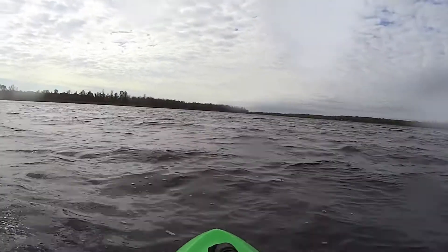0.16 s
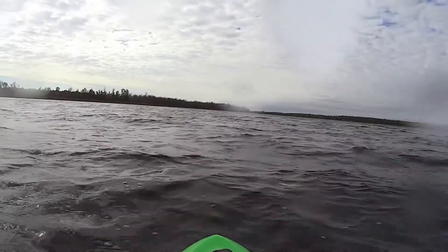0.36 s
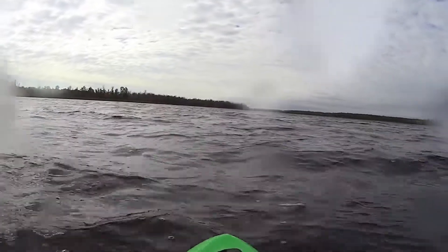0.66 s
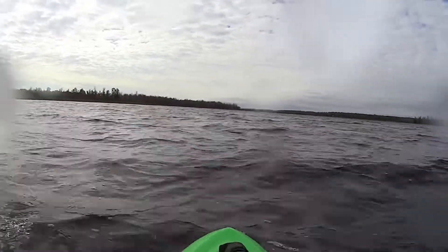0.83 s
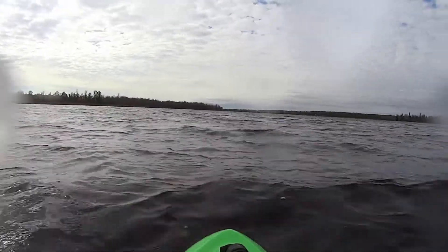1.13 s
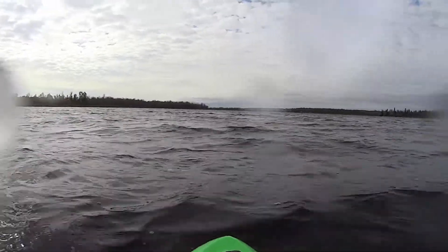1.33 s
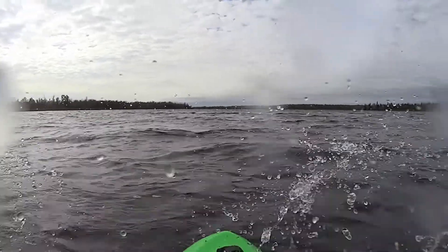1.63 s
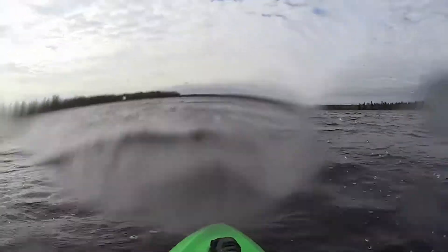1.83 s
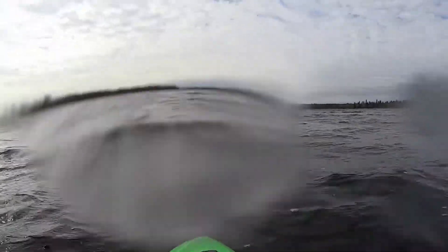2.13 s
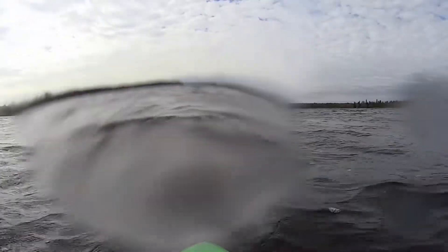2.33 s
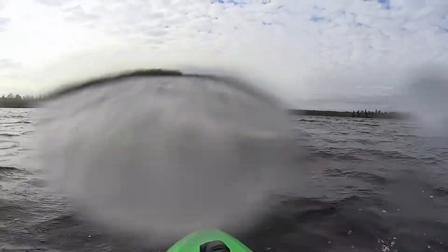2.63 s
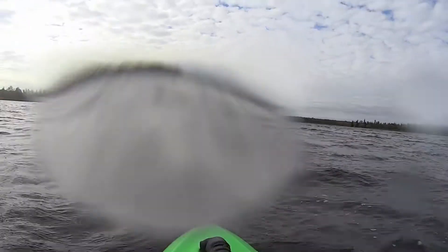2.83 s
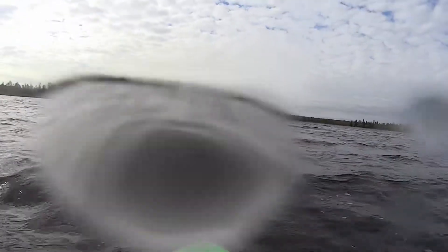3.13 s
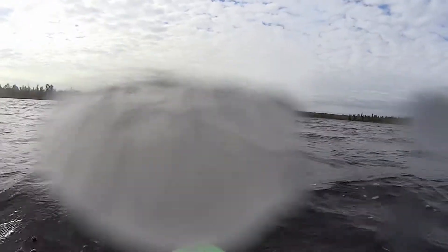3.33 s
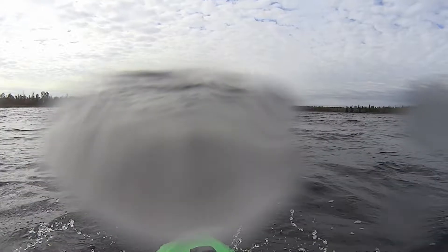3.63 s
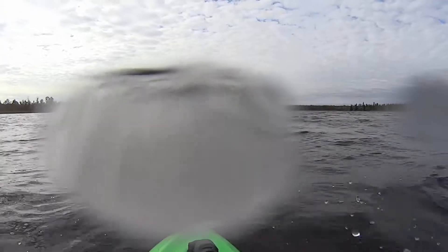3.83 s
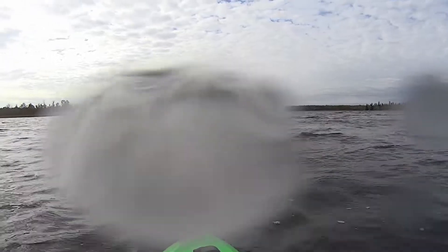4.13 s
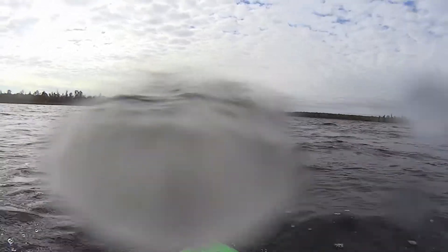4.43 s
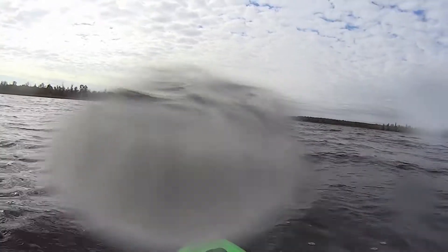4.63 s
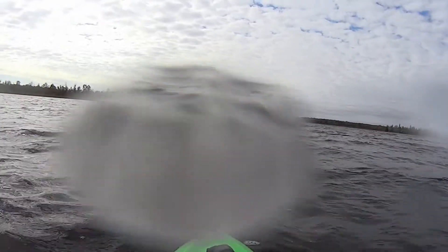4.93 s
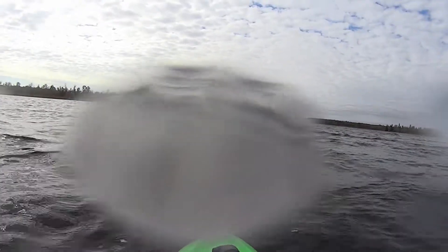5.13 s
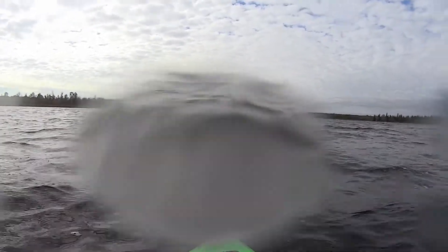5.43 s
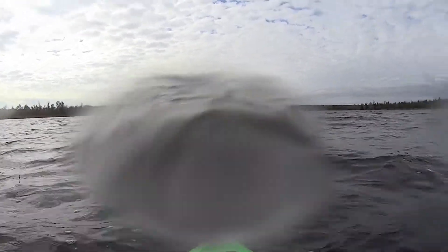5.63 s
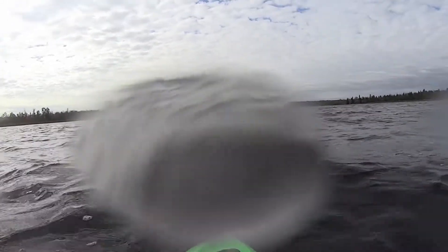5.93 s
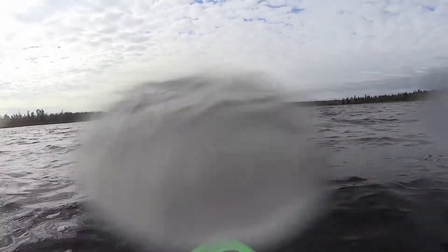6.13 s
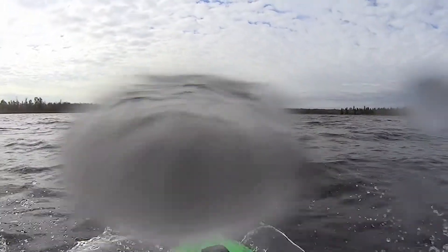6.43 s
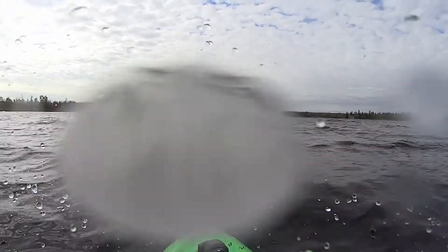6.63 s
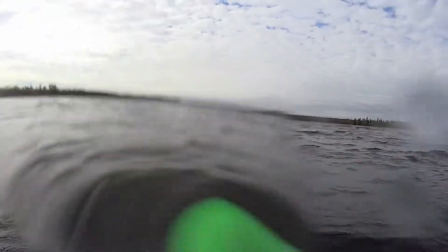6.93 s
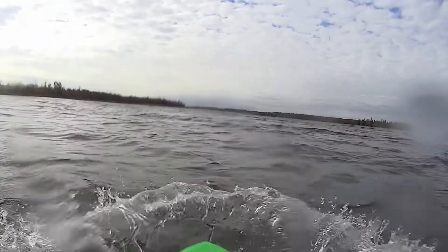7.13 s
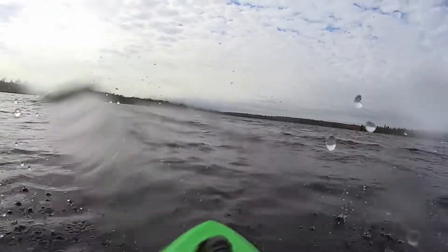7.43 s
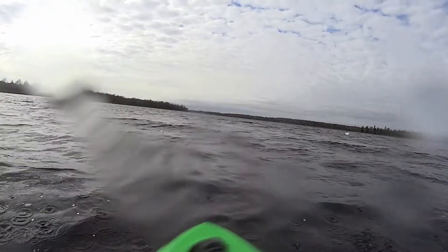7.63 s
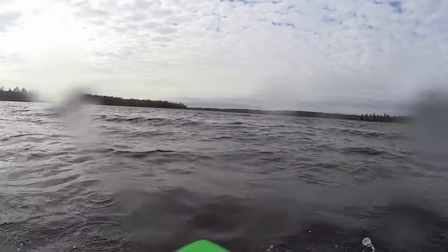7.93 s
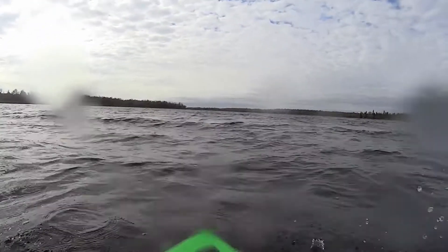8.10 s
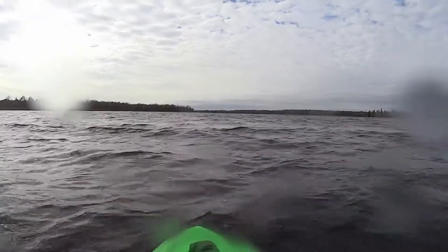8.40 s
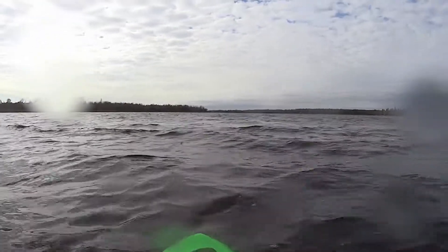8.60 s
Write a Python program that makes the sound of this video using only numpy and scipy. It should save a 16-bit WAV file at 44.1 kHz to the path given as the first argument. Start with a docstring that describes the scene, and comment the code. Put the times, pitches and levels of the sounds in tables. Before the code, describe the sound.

Close, slightly muffled stereo sound from a housing clamped to a hollow plastic kayak on choppy open water. A bright plop and slap come at about 0.2 s, with splashy knocks at 0.5 and 0.7 s. Scattered small plops lead to a boomy slap near 1.6 s and a busy run of bubbles, gurgles and foam fizz until 2.4 s. A sharp drop tick lands at 2.7 s. At 3.1 s the hardest wave knocks the hull, sweeping quickly from high to low with a deep jolt. More slosh follows at 3.5 s, loud ringing plops around 4.1-4.3 s, and a wash at 4.7 s. A hollow thud comes at 5.4 s; plops crowd 6.05-6.4 s, then booming slaps at 6.4 and 6.7 s. Washes and fizz fill 7-7.9 s, with a hard knock at 7.7 s. It calms into sparse plops, with a last small wash near 8.7 s. Low wind rumbles throughout.

```python
"""Choppy water sloshes on a hollow plastic kayak: filtered noise rings hull modes, bubble swarms ring deck and clamp.
Single plops are damped tones with splashes; far blows are chains of rings gliding down in pitch.
Foam fizzes as shaped noise and tiny bubbles, spray drops tick, wind rumbles low, microphones hiss.
Two paths blend into two ports of a clamped housing with their own balance and phase. Table levels are relative."""
import sys
import numpy as np
from scipy import signal
from scipy.fft import rfft, irfft, next_fast_len
from scipy.io import wavfile
from scipy.ndimage import uniform_filter1d, map_coordinates

SR = 44100
rng = np.random.default_rng(int(sys.argv[2]) if len(sys.argv) > 2 else 0)


def unload_wav(signal):
    """Save mono or channel-first audio to the path in sys.argv[1] as 16-bit WAV at rate SR, clipped to [-1, 1]."""
    wavfile.write(
        sys.argv[1],
        SR,
        np.round(np.clip(np.atleast_2d(signal).T, -1, 1) * 32767).astype(np.int16),
    )


N = 386302


def amp(db):
    """Gain of a level in dB."""
    return 10 ** (np.asarray(db) / 20)


def unit(x):
    """x at rms 1."""
    return x / np.sqrt(np.mean(x ** 2) + 1e-20)


def along(points, hz):
    """Each column after the first of (Hz, ..) rows, read on a log axis."""
    knots_hz, *columns = np.transpose(points)
    return np.squeeze([np.interp(np.log(hz + 1), np.log(knots_hz + 1), c) for c in columns])


def trace(rows):
    """dB per sample of a (s, dB) curve."""
    return np.interp(np.arange(N) / SR, *np.transpose(rows))


def wobble(knots_per_s):
    """Smooth random curve through normal knots."""
    return map_coordinates(rng.standard_normal(N // 100), [np.arange(N) * knots_per_s / SR])


def filtered(x, response):
    """x times a complex response of frequency, zero-padded."""
    size = next_fast_len(N + SR // 2)
    spectrum = rfft(x, size) * response(np.fft.rfftfreq(size, 1 / SR))
    return irfft(spectrum, size)[..., :N]


def ringing(x, modes):
    """x through a body: parallel resonances of (Hz, width Hz, dB), signs alternating."""
    def response(f):
        return sum((-1) ** k * amp(db) * 1j * f * width / (centre ** 2 - f * f + 1j * f * width)
                   for k, (centre, width, db) in enumerate(modes))
    return filtered(x, response)


def steady(push, modes):
    """Rms with which a body answers an even push."""
    return np.std(ringing(push[0], modes))


def bubbles(start_s, hz, size, cycles, rise, span, soft=1):
    """Sum of tones that swell and decay over some cycles while the pitch bends; span samples each."""
    u = np.arange(span) / SR * (hz / cycles)[:, None]  # 1 at the peak
    shape = (u * np.exp(1 - u)) ** soft
    tones = size[:, None] * shape * np.sin(2 * np.pi * cycles * u * (1 + rise * u))
    at = (start_s * SR).astype(int)[:, None] + np.arange(span)
    return np.bincount(at.ravel(), tones.ravel(), N + span)[:N]


def swarm(count, centre_hz, spread, cycles, scatter_db, span, bend=0):
    """Cloud of random bubbles with scattered size, pitch and bend; path two is shifted by half the length."""
    when, pitch, size = rng.random(count), rng.standard_normal(count), rng.exponential(size=count)
    hz = np.clip(centre_hz * np.exp(spread * pitch), 30, 10000)
    rise = bend * (.5 + rng.standard_normal((count, 1)))
    gain = amp(scatter_db * np.minimum(size, 3))
    cloud = unit(bubbles(when * (N - 1) / SR, hz, gain, cycles, rise, span))
    return np.array([cloud, np.roll(cloud, N // 2)])


def bursts(rows, fade_s):
    """Gain per sample of (s, length s, first dB, last dB, rise s) bursts, then 20 dB lost per fade_s."""
    gain = np.zeros(N + SR)
    for start_s, length_s, first_db, last_db, rise_s in rows:
        t = np.arange(int((length_s + 4 * fade_s) * SR)) / SR
        db = np.interp(t, [0, length_s], [first_db, last_db])
        db = db - 20 * np.maximum(t - length_s, 0) / fade_s
        gain[int(start_s * SR):][:len(t)] += amp(db) * np.minimum(t / rise_s, 1)
    return gain[:N]


def shaped(start_s, length_s, db, change_db, rise_s):
    """Burst rows that change by change_db over their length."""
    return np.transpose([start_s, length_s, db, db + change_db, rise_s + 0 * start_s])


# Short spurts of bubbles that leave the hull alone. Each row: start in seconds, length in seconds, level in dB.
SPURT_ROWS = [(0.057, 0.02, -18.5), (0.108, 0.018, -26), (0.273, 0.013, -26.5), (0.402, 0.01, -37),
              (0.457, 0.017, -34), (.875, 0.16, -35.5), (1.392, 0.013, -20), (1.419, 0.016, -19.5),
              (1.489, 0.027, -12), (1.685, 0.013, -9.5), (1.762, 0.008, -16), (1.779, 0.0062, -15),
              (1.802, 0.012, -20.5), (1.904, 0.014, -22), (2.42, 0.076, -23.5), (2.785, 0.021, -15),
              (3.61, 0.085, -24.5), (4.094, 0.34, -32.5), (4.56, 0.033, -30.5), (4.979, .03, -22),
              (5.254, 0.015, -24.5), (6.202, 0.028, -16.5), (6.233, 0.036, -20), (6.29, 0.017, -19),
              (6.694, .05, -25), (6.941, 0.15, -20.5), (7.218, 0.014, -21), (8.521, 0.35, -32.5)]
# Waves that slap the hull and die away.
# Each row: start in seconds, length in seconds, bubbling in dB, boom in dB, knock in dB.
SLAP_ROWS = [(0.175, 0.079, -20.5, -24.5, -27), (0.484, 0.034, -14, -29, -19),
             (0.672, 0.018, -14, -16.5, -16.5), (1.579, 0.019, -17, -9.5, -12),
             (3.112, 0.038, -11, -16, -6.5), (3.497, 0.07, -23, -54, -27), (5.304, 0.11, -21.5, -32.5, -39),
             (5.428, 0.041, -23.5, -16.5, -12.5), (6.384, 0.024, -13.5, -14, -29),
             (6.722, 0.046, -38, -12.5, -20), (7.442, 0.028, -22, -30, -23), (7.704, 0.065, -26, -30, -7.5)]
# Longer washes as the blade pulls or a wave runs along the boat.
# Each row: start in seconds, length in seconds, bubbling in dB, boom in dB.
WASH_ROWS = [(0.492, 0.07, -21.5, -32.5), (1.844, 0.16, -47, -27.5), (2.091, 0.24, -21.5, -23.5),
             (3.158, 0.061, -28.5, -16.5), (3.525, 0.077, -19.5, -24), (4.195, 0.17, -24, -29),
             (4.673, 0.092, -18, -20), (5.568, 0.1, -29, -35), (6.986, 0.1734, -22.5, -16.5),
             (7.463, 0.18, -33, -24), (7.708, 0.24, -20.5, -18), (8.708, 0.05, -17.5, -25)]
SLAP_FALL_DB, SLAP_RISE_S = 11.5, 0.0046  # also for spurts; fall is over the length
WASH_SWELL_DB, WASH_BOOM_FALL_DB, WASH_RISE_SHARE = 1, 4, 0.22  # bubbling grows, boom sinks; share of length
WASH_KNOCK_DB = -1  # upper hull modes over the boom
HULL_LAG_S = 0.0057  # the hull answers a slap after the first splash


def waves():
    """Gains with which slaps, washes and spurts drive bubbling, boom and knock."""
    slap_s, slap_length_s, slap_bubbling_db, slap_boom_db, slap_knock_db = np.transpose(SLAP_ROWS)
    wash_s, wash_length_s, wash_bubbling_db, wash_boom_db = np.transpose(WASH_ROWS)

    def slap(db, lag_s):
        """Rows of quick rise and steady fall."""
        return shaped(slap_s + lag_s, slap_length_s, db, -SLAP_FALL_DB, SLAP_RISE_S)

    def wash(db, change_db):
        """Rows of slow rise."""
        return shaped(wash_s, wash_length_s, db, change_db, WASH_RISE_SHARE * wash_length_s)

    spurts = shaped(*np.transpose(SPURT_ROWS), -SLAP_FALL_DB, SLAP_RISE_S)
    surge = [slap(slap_bubbling_db, 0), wash(wash_bubbling_db, WASH_SWELL_DB), spurts]
    boom = [slap(slap_boom_db, HULL_LAG_S), wash(wash_boom_db, -WASH_BOOM_FALL_DB)]
    knock = [slap(slap_knock_db, HULL_LAG_S), wash(wash_boom_db + WASH_KNOCK_DB, -WASH_BOOM_FALL_DB)]
    return (bursts(np.vstack(surge), fade_s=0.019),
            bursts(np.vstack(boom), fade_s=0.074),
            bursts(np.vstack(knock), fade_s=0.022))


# Bubbling of the chop between waves, also drives lapping. Each row: time in seconds, level in dB.
CHOP_CURVE = [(0, -34), (.3, -44), (.7, -37), (1.2, -41.5), (1.58, -30), (2.0, -32.5), (2.54, -36),
              (3.39, -44.5), (4.03, -36), (4.45, -40), (5.0, -38), (5.49, -41.5), (5.8, -49), (6.04, -42.5),
              (6.2, -33), (6.62, -34.5), (7.7, -34), (8.48, -41), (8.76, -32)]
# Modes of deck and clamp, also rung by plops. Each row: centre in Hz, width in Hz, level in dB.
DECK_MODES = [(510, 390, -8.5), (913.7, 57.5, 0.5), (1162, 136, -1.5), (1496, 62.5, 1), (1630, 93, 0),
              (2095, 527, -7.5), (2756, 410, -9), (4150, 1030, -16.5)]


def churn(surge):
    """Chop mixes crackle and gurgle, a surge crackle and blips; both shake the deck."""
    crackle = swarm(count=7000, centre_hz=1528, spread=0.664, cycles=1.09, scatter_db=3, span=256)
    gurgle = swarm(count=2200, centre_hz=1401.0, spread=0.5464, cycles=5.51, scatter_db=5.5, span=800, bend=0.0536)
    blips = swarm(count=5000, centre_hz=1593, spread=0.4986, cycles=4.53, scatter_db=2.0, span=600, bend=0.0508)
    clumps = amp(3.63 * wobble(40) + 1.7 * wobble(90))
    rush = 1.2 * rng.standard_normal((2, N))
    dense = clumps * (crackle + rush)
    calm_push = amp(trace(CHOP_CURVE)) * (.65 * dense + .55 * gurgle)
    surge_push = surge * (.8 * dense + .7 * blips)
    return ringing(calm_push + surge_push, DECK_MODES) / steady(dense, DECK_MODES)


# Modes of the hollow hull. Each row: centre in Hz, width in Hz, level in dB.
HULL_MODES = [(107, 190, -15.5), (160.3, 12.1, 2.5), (235.4, 31.4, -8), (309.2, 30, -5.5), (367, 57, -10.5),
              (568, 81, -10.5), (703, 41, -8)]
# The whole boat jolts after the hardest wave. Each row: start in seconds, pitch in Hz, peak in dB.
HEAVE_ROWS = [(3.14, 38, -29)]
CALM_DB, LAPPING_DB, LAPPING_GROWS = -36.5, -36, 0.93  # middling chop, its lapping, dB lapping per dB chop


def slosh(boom, knock):
    """Lumpy low pressure drums on the hollow hull; sharp waves reach its upper modes."""
    lumps = amp(1.8 * wobble(14) + 1.8 * wobble(45))
    push = lumps * rng.standard_normal((2, N))
    soft = filtered(push, lambda hz: 1 / (1 + 1j * hz / 900) ** 2)
    dull = filtered(soft, lambda hz: hz < 200)
    lapping = amp(LAPPING_DB + LAPPING_GROWS * (trace(CHOP_CURVE) - CALM_DB))
    lows = (lapping + boom) * dull
    highs = (lapping + knock) * (soft - dull)
    start_s, hz, db = np.transpose(HEAVE_ROWS)
    heave = bubbles(start_s, hz, amp(db), cycles=2.0, rise=-0.01, span=SR // 2)
    return ringing(lows + highs, HULL_MODES) / steady(soft, HULL_MODES) + heave


# Fizz of breaking foam. Each row: time in seconds, level in dB.
FOAM_CURVE = [(0, -44), (.29, -52), (.95, -41), (1.1, -49.5), (1.36, -53), (1.76, -31.5), (2.14, -44),
              (2.34, -31.5), (2.7, -33.5), (2.85, -45), (3.02, -50.5), (3.49, -39), (3.9, -45.5),
              (4.56, -36.5), (5.1, -50), (5.75, -55.5), (6.54, -38), (7.37, -32), (7.61, -38.5),
              (8.2, -33.5), (8.55, -47.5), (8.76, -45)]
# Foam spectrum through the housing. Each row: frequency in Hz, density in dB per Hz.
FIZZ_SPECTRUM = [(600, -37), (1200, 4), (1700, 3), (2200, -0.5), (2800, -1), (3300, -5.5), (4400, -4.5),
                 (6000, -8.5), (7200, -21.5), (11000, -24)]


def foam():
    """Countless tiny bubbles burst over a hiss with drifting time-frequency patches."""
    cloud = swarm(count=6000, centre_hz=4387, spread=0.404, cycles=12.5, scatter_db=3.5, span=128)
    z = signal.stft(rng.standard_normal((2, N)) + 0.78 * cloud, nperseg=256)[2]
    patches = uniform_filter1d(rng.standard_normal(z.shape[1:]), size=8, axis=0)  # across frequency
    patches = uniform_filter1d(patches, size=12, axis=1)  # across time
    hiss = signal.istft(z * amp(1.8 * unit(patches)), nperseg=256)[1][:, :N]
    fizz = filtered(hiss, lambda hz: amp(along(FIZZ_SPECTRUM, hz)))
    return amp(trace(FOAM_CURVE)) * unit(fizz)


# Wind on the housing. Each row: frequency in Hz, density in dB per Hz.
RUMBLE_SPECTRUM = [(18, -13), (40, -7.5), (80, -4), (130, -1), (300, -46)]


def wind():
    """Low-passed noise in slow random gusts."""
    rumble = filtered(rng.standard_normal((2, N)), lambda hz: amp(along(RUMBLE_SPECTRUM, hz)))
    return amp(-47 + 2.75 * wobble(1.772)) * unit(rumble)


# Single large bubbles. Each row: time in seconds, peak in dB, pitch in Hz.
PLOP_ROWS = [(0.159, -14.5, 950), (0.178, -7.5, 950), (0.487, -14, 1087), (0.628, -18.5, 1160),
             (0.69, -7, 1440), (.86, -26, 1260), (0.878, -25, 1250), (0.909, -20, 926), (1.006, -30, 1070),
             (1.057, -14.5, 1430), (1.165, -29, 930), (1.303, -25, 1600), (1.332, -12.5, 897),
             (1.378, -18.5, 1560), (1.398, -12.5, 1430), (1.491, -14, 950), (1.586, -8.5, 914),
             (1.668, -15.5, 955), (1.69, -13.5, 1660), (1.731, -14, 1400), (1.757, -9.5, 1440),
             (1.881, -11, 1380), (1.97, -14.5, 2000), (2.092, -13.5, 1460), (2.11, -12.5, 1230),
             (2.144, -9, 1536), (2.226, -9.5, 568), (2.764, -14, 1483), (2.796, -14.5, 1150),
             (2.908, -17, 1340), (2.986, -11.5, 1540), (3.11, -17, 1600), (3.505, -9.5, 1400),
             (3.536, -10, 897), (3.653, -18, 1315), (4.038, -14.5, 1510), (4.109, -7, 1924),
             (4.288, -4, 1450), (4.307, -5, 1480), (4.876, -10.5, 1576), (4.928, -14.5, 1490),
             (4.955, -14.5, 1510), (5.199, -28.5, 1600), (5.213, -17.5, 1434), (5.245, -23, 1590),
             (5.315, -14, 1160), (5.354, -12.5, 1700), (5.487, -24, 1050), (5.611, -17.5, 1130),
             (5.661, -23, 1160), (5.726, -17.5, 1440), (6.058, -11.5, 1477), (6.084, -15, 1410),
             (6.117, -12.5, 898), (6.152, -13, 1226), (6.185, -10.5, 1570), (6.279, -9, 1440),
             (6.299, -14.5, 1620), (6.354, -21, 1470), (6.38, -15, 1490), (6.479, -20, 1235),
             (6.49, -14.5, 360), (6.76, -19, 1450), (6.79, -17, 1490), (6.907, -12.5, 1530),
             (6.919, -10.5, 1690), (6.928, -8.5, 1620), (7.112, -11, 1700), (7.338, -14, 1470),
             (7.389, -15, 1390), (7.483, -19, 1000), (7.49, -15, 1420), (7.937, -9, 1516),
             (8.112, -17.5, 1260), (8.529, -19.5, 1480), (8.706, -10.5, 1520)]


def plops():
    """Each large bubble sounds its own pitch; its small splash shakes the deck, which rings on."""
    at_s, db, hz = np.transpose(PLOP_ROWS)
    tones = bubbles(at_s - .001, hz, amp(db), cycles=2.72, rise=0.0035, span=1024, soft=0.72)
    spurt_rows = [(start_s, .004, peak_db - 6, peak_db - 9, .002) for start_s, peak_db in zip(at_s - .002, db)]
    spurt = bursts(spurt_rows, fade_s=0.049)
    impact = bubbles(at_s - .001, hz, amp(db + 3.5), cycles=0.24, rise=0, span=128)
    splash = ringing(spurt * rng.standard_normal((2, N)) + impact, DECK_MODES)
    sound = amp(-3.0) * tones + amp(-8.5) * ringing(tones, DECK_MODES)
    pair = np.array([sound, np.roll(sound, 60)])  # path two lags 60 samples
    return pair + amp(2.0) * splash


# Spray on the housing. Each row: time in seconds, peak in dB, pitch in Hz.
DROP_ROWS = [(0.4781, -12.5, 5120), (1.731, -19, 4530), (1.7752, -23, 4600), (1.8423, -9, 4210),
             (1.877, -19, 3670), (1.949, -20, 5200), (2.1206, -23, 3930), (2.6865, -7, 4780),
             (3.5042, -25, 4500), (4.677, -20, 4160), (5.4283, -29, 3800), (7.361, -19.5, 4450),
             (7.445, -20, 2830)]


def drops():
    """A drop ticks at its pitch with a short low crack; the housing dulls the top."""
    at_s, db, hz = np.transpose(DROP_ROWS)
    tick = bubbles(at_s - .0005, hz, amp(db), cycles=3, rise=0, span=256)
    crack_hz = np.full(len(at_s), 1500)
    crack = bubbles(at_s - .0005, crack_hz, amp(db - 10.0), cycles=0.79, rise=0, span=256)
    both = tick * (1 + .5 * rng.standard_normal((2, N))) + crack
    return filtered(both, lambda hz: 1 / (1 + (hz / 6500) ** 8) ** .5)


# Waves that strike far along the boat; the hull brings the high sound first, the low sound last.
# Each row: start in seconds, length in seconds, level in dB.
GLIDE_ROWS = [(3.106, .04, -13.5), (6.678, .065, -21.5)]
GLIDE_FROM_HZ, GLIDE_TO_HZ, GLIDE_SPREAD, GLIDE_SWELL_DB = 2080, 290, 0.33, 4  # spread in log pitch


def glides():
    """Chain of 48 short rings whose pitch sinks while the blow travels along the hull."""
    start_s, length_s, db = np.transpose(GLIDE_ROWS)[:, :, None]
    pitch, size = rng.standard_normal((2, len(start_s), 48))
    done = np.linspace(0, 1, 48)
    path_hz = GLIDE_FROM_HZ * (GLIDE_TO_HZ / GLIDE_FROM_HZ) ** done
    hz = path_hz * np.exp(GLIDE_SPREAD * pitch * (1 - done / 2))
    gain = amp(db - GLIDE_SWELL_DB * (1.5 - done) + 2 * size) * np.sign(size)
    at_s = start_s + length_s * done
    return bubbles(at_s.ravel(), hz.ravel(), gain.ravel(), cycles=0.93, rise=-0.025, span=2048)


# How hull and housing reach the two ports.
# Each row: frequency in Hz, left over right in dB, left lead in radians, likeness 0-1.
PORT_ROWS = [(40, 1.8, -.2, .8), (160, -1.6, -.8, .98), (370, -4.4, -.9, .93), (460, -7, -2, .6),
             (590, -3.3, -2.2, .82), (700, .3, -2.5, .8), (900, -6, -.3, .85), (1700, -9, 0, .9),
             (1950, -2, 1.2, .8), (2800, -5.5, .3, .7), (3600, -1, 1.8, .5), (5700, -2.5, 2.7, .25),
             (7500, -1, .2, .3)]


def ports(pair):
    """Two paths blend into left and right by likeness, balance and phase."""
    def response(hz):
        left_db, lead_rad, alike = along(PORT_ROWS, hz)
        turn = np.arccos(alike) / 2  # mixing angle that gives this likeness
        tilt = amp(left_db / 2) * np.exp(.5j * lead_rad)
        left = [np.cos(turn) * tilt, np.sin(turn) * tilt]
        right = [np.cos(turn) / tilt, -np.sin(turn) / tilt]
        return np.array([left, right])
    return filtered(pair, response).sum(axis=1)


def scene():
    """All sounds at the two ports."""
    surge, boom, knock = waves()
    water = churn(surge) + slosh(boom, knock) + foam()
    return ports(water + wind() + plops() + drops() + glides())


# Shape of the microphone noise. Each row: frequency in Hz, relative level in dB.
HISS_SPECTRUM = [(20, -83), (300, -58), (2000, -101), (7000, -79), (11000, -79)]
LOW_HZ, TOP_HZ = 18, 11150


def record(dry):
    """Microphone hiss, soft overload, band limits."""
    hiss = filtered(rng.standard_normal((2, N)), lambda hz: amp(along(HISS_SPECTRUM, hz) + 19.0))
    opposed = .5 * hiss[1] * np.array([[1], [-1]])
    x = dry + hiss[0] + opposed
    x = x / (1 + np.abs(x / .98) ** 6) ** (1 / 6)
    return filtered(x, lambda hz: (hz < TOP_HZ) * (hz > LOW_HZ))


dry = scene()
out = record(dry)
unload_wav(out)
```